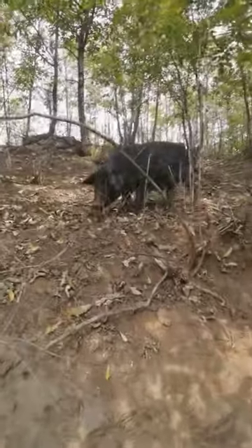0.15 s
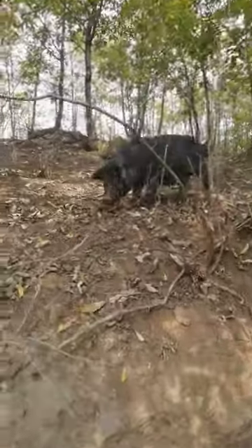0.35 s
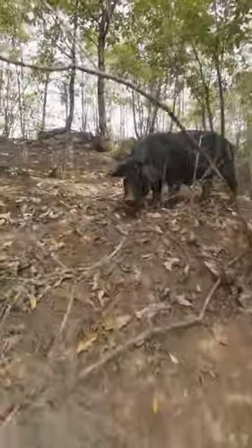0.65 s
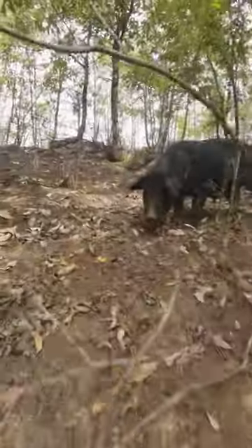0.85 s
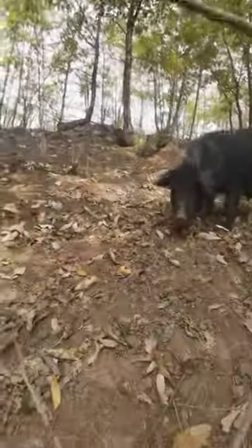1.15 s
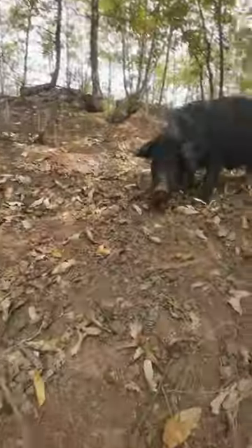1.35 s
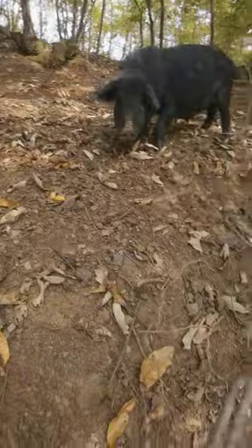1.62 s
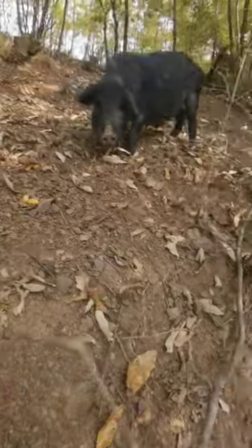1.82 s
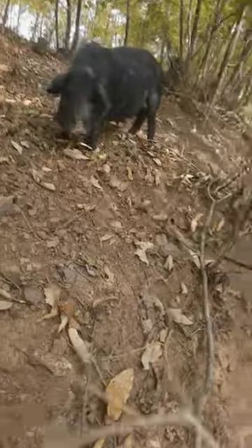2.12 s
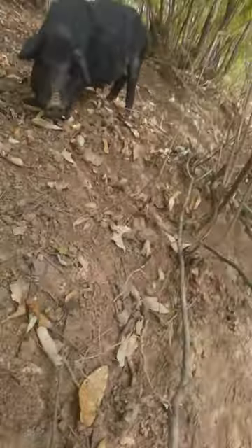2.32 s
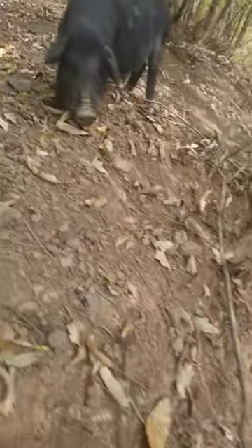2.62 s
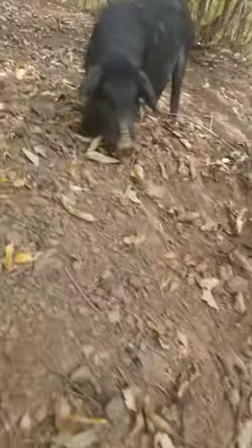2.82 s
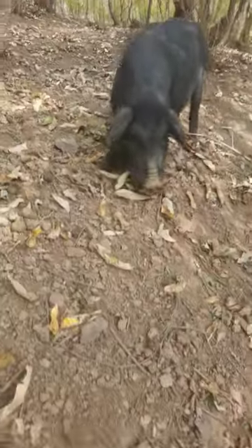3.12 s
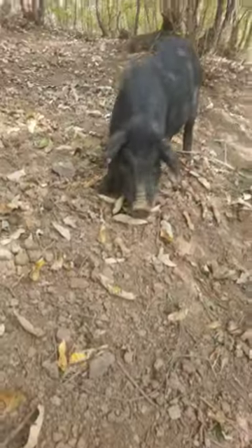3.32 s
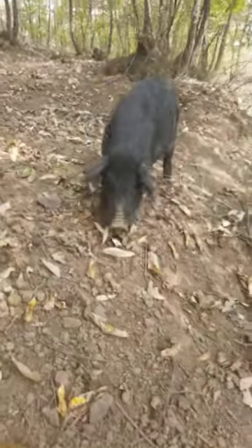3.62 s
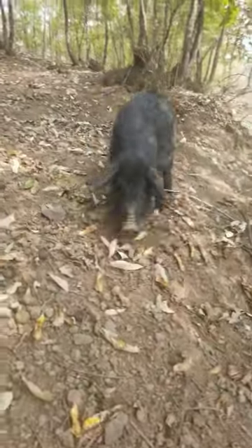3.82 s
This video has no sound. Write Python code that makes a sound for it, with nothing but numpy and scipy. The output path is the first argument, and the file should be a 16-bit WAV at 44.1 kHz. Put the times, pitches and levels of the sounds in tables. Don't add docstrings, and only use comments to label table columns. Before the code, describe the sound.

Three brief, throaty pig grunts over intermittent leaf crunches, ticks and twig cracks on a dry forest slope, with faint foliage hiss, soft handling thuds and very little echo, picked up in stereo by a phone.

```python
import sys
import numpy as np
from scipy import signal
from scipy.fft import rfft, irfft
from scipy.io import wavfile
from scipy.ndimage import uniform_filter1d, map_coordinates

SR = 44100
rng = np.random.default_rng(int(sys.argv[2]) if len(sys.argv) > 2 else 0)


def elevation(decibels):
    levels = np.asarray(decibels, float)
    return 10 ** (levels / 20)


def store_wav(level_fs):
    pcm = np.round(np.clip(np.atleast_2d(level_fs), -1, 1) * 32767)
    wavfile.write(sys.argv[1], SR, pcm.T.astype(np.int16))


N = 174195
PATCHY_DB = 3.5

# [f/Hz, level/dB, t60/s]
THROAT = [(128.3, -1.5, 0.065), (200, -2.5, 0.029), (273, -14.5, 0.16), (416, -4.5, 0.058),
          (577, -5, 0.029), (765, 0, 0.014), (861, -8, 0.038)]
# [t/s, nostril level/dB, lag of the left port/samples, cheek level/dB]
FACING = [
    (1.25, -31, -3, -6),
    (3.16, -10.5, -3.5, -14),
    (3.6, -1, -2, -33),
]
# [t/s, left-right level/dB, lag of the left port/samples]
SIDE_OF_LEAVES = [
    (0, 1.5, 21.5),
    (.68, -4.5, 22.5),
    (1.4, -1, 21.5),
    (2.5, -5, 24),
    (2.75, 0.5, 20),
    (3.5, -1, -4.5),
]


def curve(table, col, t):
    table = np.array(table, float)
    return np.interp(t, table[:, 0], table[:, col])


def unit(x):
    return x / np.sqrt(np.mean(x ** 2))


def colour(x, points):
    p = np.array(points, float)
    hz = np.fft.rfftfreq(x.shape[-1], 1 / SR) + 1
    db = np.interp(np.log(hz), np.log(p[:, 0]), p[:, 1], left=-60, right=-60)
    return unit(irfft(rfft(x) * elevation(db), x.shape[-1]))


def walk(rate):
    k = int(SR / rate)
    steps = np.repeat(rng.standard_normal(N // k + 1), k)
    return unit(uniform_filter1d(uniform_filter1d(steps, k), k)[:N])


def patchy(x, db):
    z = signal.stft(x, nperseg=256)[2]
    field = uniform_filter1d(rng.standard_normal(z.shape[-2:]), size=7, axis=0)
    field = uniform_filter1d(field, size=9, axis=1)
    return unit(signal.istft(z * elevation(db * unit(field)), nperseg=256)[1][..., :N])


def sides(pan_db):
    return elevation(np.array([pan_db / 2, -pan_db / 2]))


def ports(x, lag):
    x = np.broadcast_to(x, (2, N))
    left = map_coordinates(x[0], [np.arange(N) - lag], mode="mirror")
    return np.array([left, x[1]])


def add(out, at_s, x):
    i = int(at_s * SR)
    n = min(x.shape[-1], N - i)
    out[..., i:i + n] += x[..., :n]


def ring(modes, stretch=0.917, turn=0.):
    t = np.arange(SR // 8) / SR
    out = np.zeros(len(t))
    for k, (hz, db, t60) in enumerate(modes):
        out += (-1) ** k * elevation(db - 60 * t / t60) * np.sin(2 * np.pi * hz * stretch * t + k * turn)
    strike_s = 0.0003
    return (1 - np.exp(-t / strike_s)) * out


def pig(t):
    # [start/s, length/s, chest level/dB, first chest f/Hz, breath level/dB]
    grunts = [
        (1.267, 0.064, -26, 78.3, -37),
        (3.184, 0.058, -23, 87, -35),
        (3.63, 0.038, -24.5, 105.6, -35.5),
    ]
    return palate_slaps() + chest(t, grunts) + breath(t, grunts)


def palate_slaps():
    # [t/s, level/dB, sharpness of the snout ring/dB, snout stretch/ratio]
    slap_table = [(1.216, -37.5, -13, 1), (1.233, -29.5, -20, 1.01), (1.251, -20.5, 4.5, 1.03),
                  (1.276, -20, -14, 1.09), (1.295, -44, 9, 0.92), (1.319, -33, -4, 1.13),
                  (3.131, -30.5, -6, 1.01), (3.146, -27.5, -1.5, 1.11), (3.1655, -15.5, 0.5, 1.033),
                  (3.191, -20, -26, 0.97), (3.207, -38, -3, 1.16), (3.229, -32, -8, 1.1),
                  (3.5989, -23.5, 7.5, 1.01), (3.627, -17.5, 5, 0.97)]
    # [f/Hz, level/dB, t60/s]
    snout_modes = [(1580, -9, 0.022), (2120, 0, 0.034), (2350, 7, 0.005)]
    # [f/Hz, level/dB, t60/s]
    nostril_modes = [(3615, -7.5, .014), (4800, -15, .014), (5400, -17, 0.011), (7650, -13, 0.017)]
    # [f/Hz, level/dB, t60/s]
    cheek_modes = [(2780, 4, 0.0088)]
    flutter_s, puff_s = 0.0041, 0.0011
    out, short = np.zeros(N), np.arange(SR // 50) / SR
    for s, db, sharp_db, stretch in slap_table:
        luck = rng.standard_normal(len(short))
        flutter = luck * np.exp(-short / flutter_s)
        flutter /= np.sqrt(np.sum(flutter ** 2))
        push = elevation(2 * min(sharp_db, 0)) * (short == 0) + elevation(-11.5) * flutter
        push /= np.sqrt(np.sum(push ** 2))
        gust = luck[::-1] * short * np.exp(-short / puff_s)
        puff = signal.fftconvolve(ring(nostril_modes, 1.), gust)[:SR // 8]
        snout = ring(snout_modes, stretch)
        snout += elevation(curve(FACING, 1, s)) * puff / np.max(np.abs(puff))
        snout += elevation(curve(FACING, 3, s)) * ring(cheek_modes, stretch)
        snout = signal.fftconvolve(snout, push)[:len(snout)]
        throat = ring(THROAT, stretch, .5 * luck[0])
        add(out, s, -elevation(db) * (throat + elevation(sharp_db) * snout))
    return out


def chest(t, grunts):
    sag, octave_db, peak_at, roughness = 0.29, -8.5, 0.5, 0.42
    out = np.zeros(N)
    rough = 1 + roughness * walk(60)
    for s, length, db, hz, _ in grunts:
        u = np.clip((t - s) / length, 0, 1)
        phase = 2 * np.pi * hz * length * (u - sag * u ** 2 / 2)
        swell = np.sin(np.pi * u ** (np.log(.5) / np.log(peak_at)))
        boom = sum(elevation(octave_db * k) * np.cos((k + 1) * phase) for k in range(3))
        out -= elevation(db) * swell * rough * boom
    return out


def breath(t, grunts):
    # [f/Hz, level/dB, t60/s]
    sniff_modes = [(1615, -8.5, .03), (2290, 2, 0.047)]
    lead_s, snout_db = 0.053, -11
    tract = ring(THROAT) + elevation(snout_db) * ring(sniff_modes, 0.98)
    air = unit(signal.fftconvolve(rng.standard_normal(N), tract)[:N]) * elevation(4.3 * walk(70))
    out = np.zeros(N)
    for s, length, _, _, db in grunts:
        u = np.clip((t - s + lead_s) / (length + 1.55 * lead_s), 0, 1)
        out += elevation(db) * np.abs(np.sin(np.pi * u)) * air
    return out


def echo(voice):
    echo_db, t60_s, low_hz = -17.5, 0.24, 160
    lag = np.arange(SR // 4) / SR
    trunks = rng.standard_normal((2, len(lag))) * elevation(-60 * lag / t60_s) * (lag > .004)
    trunks /= np.sqrt(np.sum(trunks ** 2) / 2)
    out = signal.fftconvolve(voice[None], trunks, axes=1)[:, :N]
    return elevation(echo_db) * signal.sosfilt(signal.butter(1, low_hz, "high", fs=SR, output="sos"), out)


def leaves(t):
    grit = leaf_grit()
    floor = treads(t, grit) + snaps() + ticks() + curls(grit)
    return ports(floor, curve(SIDE_OF_LEAVES, 2, t)) * sides(curve(SIDE_OF_LEAVES, 1, t))


def leaf_grit():
    grains_per_s, spread_db, mix_db = 400, 3.5, -3
    size = elevation(spread_db * np.minimum(rng.exponential(size=N), 3))
    grains = (rng.random(N) < grains_per_s / SR) * size * rng.choice([-1, 1], N)
    noise = .4 * rng.standard_normal(N) + rng.standard_normal((2, N))
    return patchy(noise + elevation(mix_db) * unit(grains), PATCHY_DB)


def treads(t, grit):
    # [peak t/s, level/dB, rise/s, fall/s, dull part/dB]
    crunch_table = [(.18, -47.5, 0.058, 0.056, -4), (0.441, -41.5, 0.051, 0.041, -13),
                    (0.679, -45.5, 0.046, 0.062, -3), (.78, -50.5, 0.29, 0.2, -9.5),
                    (1.049, -56, 0.0073, 0.12, -4), (1.413, -36, 0.04, 0.064, -11),
                    (1.706, -30, 0.0017, 0.0089, -23), (1.809, -36, 0.047, 0.031, -8.5),
                    (1.88, -43, 0.023, 0.015, -3), (1.988, -42.5, 0.0085, 0.009, -1),
                    (2.07, -40, 0.069, 0.17, -5), (2.27, -51, 0.059, 0.018, 5.5),
                    (2.326, -40, 0.016, 0.035, -1.5), (2.41, -46.5, 0.08, 0.049, -21),
                    (2.524, -31.5, 0.0082, 0.013, -12), (2.554, -35.5, 0.02, 0.022, -18.5),
                    (2.752, -46.5, 0.04, 0.041, 2.5), (3.242, -42, 0.053, 0.016, -6.5),
                    (3.337, -65, 0.021, 0.024, 19.5), (3.527, -44, 0.04, 0.23, -9.5),
                    (3.691, -32.5, 0.015, 0.04, -5.5), (3.778, -26, .012, 0.024, -14.5),
                    (3.757, -28.5, 0.0033, 0.011, -19), (3.888, -36.5, 0.11, 0.078, -15)]
    # [f/Hz, level/dB]
    leaf_colour = [(1470, -12), (2500, -3.5), (2720, -6.5), (3720, -11), (4690, -3.5), (5350, -6.5),
                   (8460, -3.5), (13800, -20), (16000, -12)]
    # [f/Hz, level/dB]
    soil_colour = [(180, -48), (300, 0.5), (404, -0.5), (1020, -4), (1590, -7.5), (2940, -19.5), (3500, -9),
                   (4550, -73), (7700, -120)]
    crisp, dull = np.zeros(N), np.zeros(N)
    for s, db, rise, fall, dull_db in crunch_table:
        away = np.where(t < s, (s - t) / rise, (t - s) / fall)
        swell = elevation(db) ** 2 * np.exp(-away ** 1.23 * 1.9)
        crisp += swell
        dull += swell * elevation(dull_db) ** 2
    leaf = np.sqrt(crisp) * elevation(2.84 * walk(44.99)) * colour(grit, leaf_colour)
    soil = np.sqrt(dull) * elevation(0.7 * walk(30.08)) * colour(grit, soil_colour)
    return leaf + soil


def snaps():
    # [t/s, peak level/dB, ring f/Hz, left-right beyond the tread/dB]
    snap_table = [(0.822, -25, 2240, 5), (1.0515, -32, 7650, 0), (1.166, -45, 2000, -9),
                  (1.4158, -27, 8650, -4), (1.706, -23.5, 2520, -0.5), (1.8142, -17, 3070, -9.5),
                  (1.8363, -29.5, 1350, 9), (1.951, -26, 1280, 12.5), (1.9815, -31, 2430, 0),
                  (2.2454, -36, 1990, -10), (2.2678, -24, 2720, -9), (2.2738, -25.5, 4000, -2),
                  (2.3152, -34, 1010, -6.5), (2.5242, -20, 1304, 3), (3.106, -46, 2300, -11),
                  (3.5145, -36, 850, 3), (3.3348, -44, 1340, -4), (3.8804, -21.5, 5270, 3),
                  (3.923, -31, 2400, 0), (.9545, -41, 800, -4), (1.675, -52, 1010, 0)]
    ring_cycles, crack_db, crack_s = 3.17, -5.5, 0.0015
    out, t = np.zeros((2, N)), np.arange(SR // 20) / SR
    cracks = colour(rng.standard_normal((len(snap_table), len(t))),
                    [(800, -5.0), (3000, -3.5), (9000, -3.0), (15000, -26)])
    for (s, db, hz, pan_db), crack in zip(snap_table, cracks):
        twig = np.exp(-t * hz / ring_cycles) * np.sin(2 * np.pi * hz * t)
        twig += elevation(crack_db) * min(hz / 3000, 1) * crack * np.exp(-t / crack_s)
        add(out, s, elevation(db) * twig * sides(pan_db)[:, None])
    return out


def ticks():
    # [t/s, peak level/dB, centre f/Hz]
    tick_table = [(.306, -35.5, 8000), (.341, -36, 8500), (0.381, -33.5, 7900), (.751, -32, 8460),
                  (.768, -33, 10000), (0.822, -38, 9500), (.875, -36, 6600), (.886, -32.5, 8800),
                  (.905, -36, 8000), (.954, -36, 7250), (1.052, -30, 7000), (1.7066, -25, 6700),
                  (1.74, -34, 8300), (1.767, -28, 6700), (1.799, -33, 4500), (1.813, -21.5, 5800),
                  (1.838, -30, 4000), (2.221, -42, 4020), (2.243, -32, 7500), (2.246, -24.5, 5900),
                  (2.271, -30, 6000), (2.274, -51, 9000), (2.291, -39, 6500), (2.315, -32, 6000),
                  (2.354, -38, 8000), (2.389, -29, 7740), (2.42, -33, 7900), (2.44, -37.5, 7000),
                  (2.459, -38, 6200), (2.47, -37, 7000), (2.504, -38, 10000), (2.517, -38, 7200),
                  (2.5242, -17, 7500), (2.532, -20, 6960), (2.5492, -24.5, 6450), (2.718, -31.5, 8200),
                  (2.993, -39.5, 8060), (3.106, -35, 6900), (3.293, -37, 6000), (3.368, -55, 3020),
                  (3.514, -27.5, 8050), (3.69, -19.5, 7400), (3.757, -32, 8000), (3.776, -14.5, 6000),
                  (3.835, -34, 4000), (3.88, -23.5, 7040), (3.922, -37, 7500)]
    cycles, tail_db, tail_s = 2.2, -10.5, .002
    out, t = np.zeros(N), np.arange(SR // 50) / SR
    for s, db, hz in tick_table:
        noise = rng.standard_normal(len(t) + 2)
        wisp = .5 * (noise[2:] - noise[:-2])
        click = 2 * np.exp(-t * hz / cycles) * np.sin(2 * np.pi * hz * t)
        add(out, s, elevation(db) * (click + elevation(tail_db) * wisp * np.exp(-t / tail_s)))
    return out


def curls(grit):
    # [peak t/s, level/dB, rise/s, fall/s, centre f/Hz]
    curl_table = [
        (0.676, -33.5, .004, 0.011, 8200),
        (2.527, -28, 0.0034, 0.019, 8060),
        (2.53, -35, .004, 0.01, 4000),
        (3.69, -23, 0.0046, 0.0088, 5320),
        (3.759, -25.5, 0.0016, .008, 5560),
        (3.778, -19, 0.0025, 0.0048, 5400),
        (3.779, -21, 0.0034, 0.0055, 3900),
        (3.79, -29, 0.0043, 0.0047, 5940),
    ]
    width = 0.19
    out, t = np.zeros((2, N)), np.arange(SR // 10) / SR - .03
    for s, db, rise, fall, hz in curl_table:
        i = int((s + t[0]) * SR)
        hollow = signal.butter(1, [hz * (1 - width), hz * (1 + width)], "band", fs=SR, output="sos")
        burst = unit(signal.sosfilt(np.vstack([hollow, hollow]), grit[:, i:i + len(t)]))
        swell = np.exp(-np.where(t < 0, -t / rise, t / fall))
        add(out, s + t[0], elevation(db) * swell * burst)
    return out


def knocks(t):
    # [t/s, level/dB, f/Hz, left-right level/dB]
    knock_table = [
        (2.323, -29.5, 168, -24),
        (2.342, -27.5, 230, -22),
        (2.3465, -24, 242, -20),
        (2.351, -30, 198, -15),
        (2.388, -30.5, 345, -14),
        (2.41, -37, 427, -8),
        (3.789, -25, 102, -1),
    ]
    out, t = np.zeros((2, N)), t[:SR // 20]
    for s, db, hz, pan_db in knock_table:
        thud = np.exp(-t * hz / 1.04) * np.sin(2 * np.pi * hz * t)
        add(out, s, elevation(db) * thud * sides(pan_db)[:, None])
    return out


def port_rumble(t):
    # [t/s, level/dB]
    gust_table = [(0, -53), (.45, -52), (.57, -47), (1.0, -45), (1.2, -51.5), (1.45, -43.5), (1.65, -52),
                  (1.8, -39), (1.95, -51.5), (2.08, -38.5), (2.2, -35.5), (2.4, -36.5), (2.52, -52),
                  (2.78, -44.5), (2.95, -52), (3.4, -53.5), (3.58, -47.5), (3.95, -47.5)]
    # [f/Hz, level/dB]
    rumble_colour = [(12, -43), (20, -29), (53, 9.5), (168, 0), (210, -3), (282, -8), (441, -21.5),
                     (700, -22.5), (910, -67), (1540, -120)]
    air = rng.standard_normal((2, N)) + 1.32 * rng.standard_normal(N)
    level = elevation(curve(gust_table, 1, t) + 2.2 * walk(26))
    return level * sides(1.2 * curve(SIDE_OF_LEAVES, 1, t)) * colour(air, rumble_colour)


def foliage():
    # [f/Hz, level/dB]
    foliage_colour = [(180, -53), (300, -3), (1040, -8), (1280, -3), (2070, -4), (5800, -7), (7950, 0.5),
                      (13100, -17.5), (16000, -2)]
    level_db = -57.5 + 1.5 + 2.15 * walk(12) + 0.67 * walk(4.2)
    return elevation(level_db) * colour(patchy(rng.standard_normal((2, N)), PATCHY_DB), foliage_colour)


def scene():
    t = np.arange(N) / SR
    voice = pig(t)
    front = ports(voice, curve(FACING, 2, t)) + echo(voice)
    return front + leaves(t) + knocks(t) + port_rumble(t) + foliage()


def roll_off(x):
    return signal.sosfilt(signal.butter(12, 16490, fs=SR, output="sos"), x)


def record(dry):
    low_hz, top_hz = 45, 15000
    mix = signal.sosfilt(signal.butter(2, low_hz, "high", fs=SR, output="sos"), dry)
    mix = signal.sosfilt(signal.ellip(6, .5, 40, top_hz, fs=SR, output="sos"), mix)
    return roll_off(mix)


dry = scene()
out = record(dry)
store_wav(out)
```